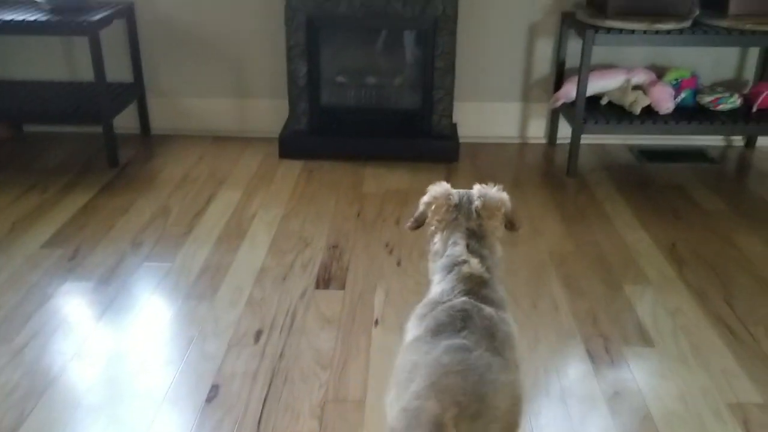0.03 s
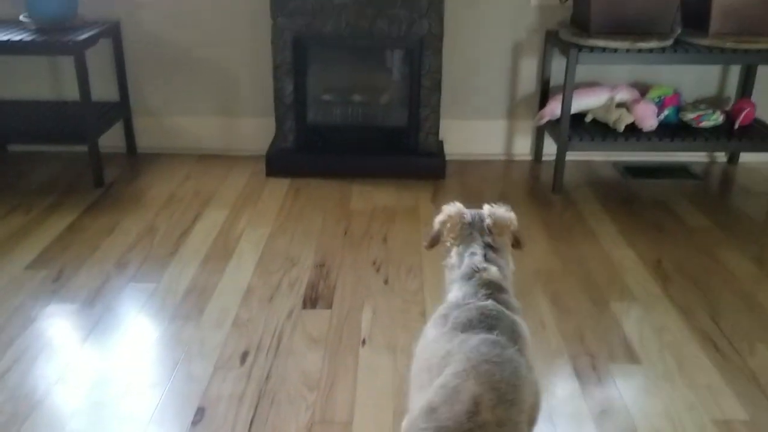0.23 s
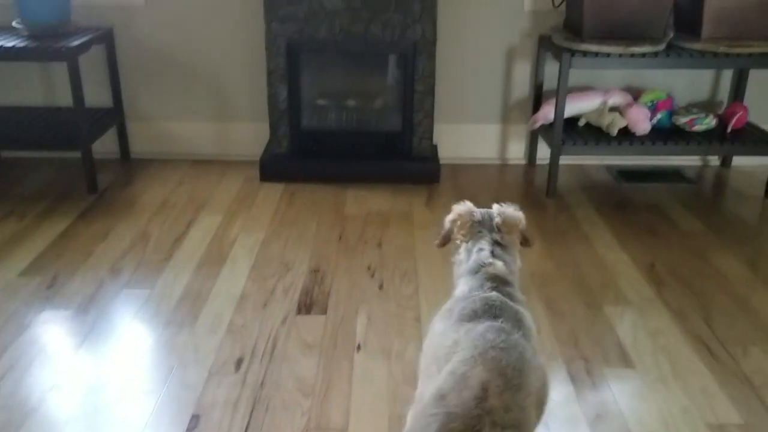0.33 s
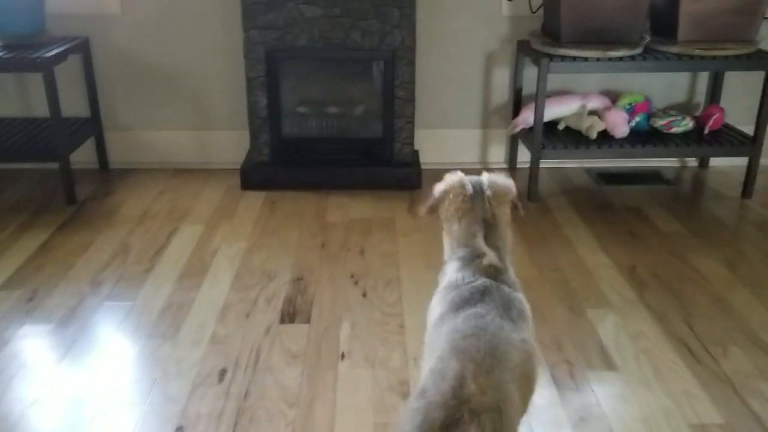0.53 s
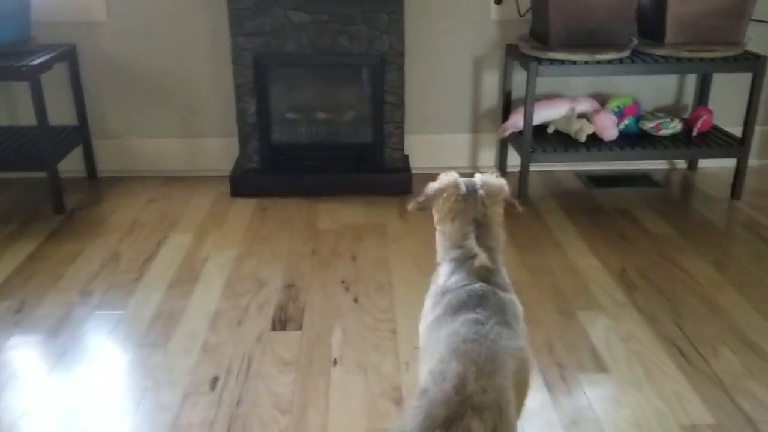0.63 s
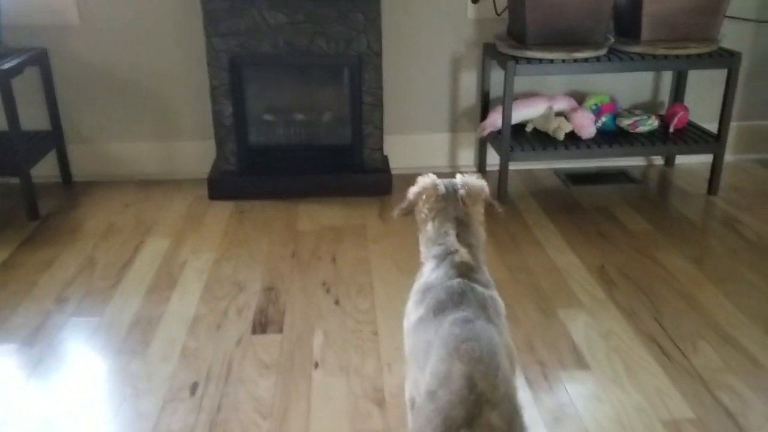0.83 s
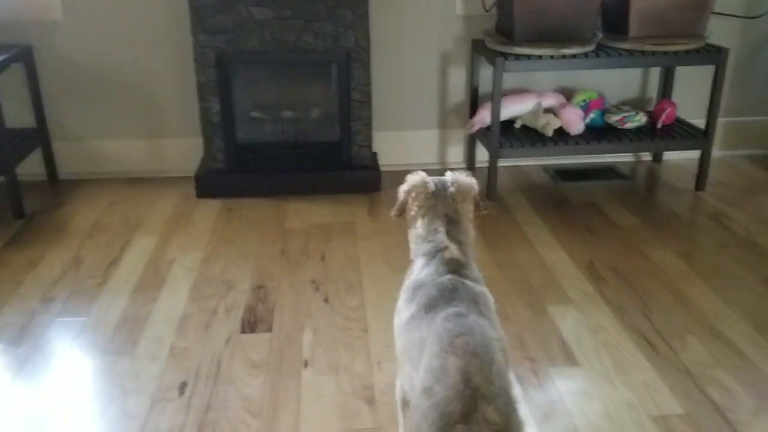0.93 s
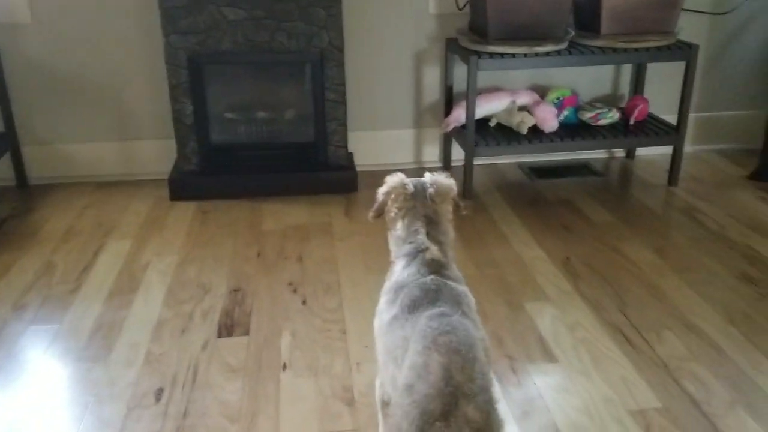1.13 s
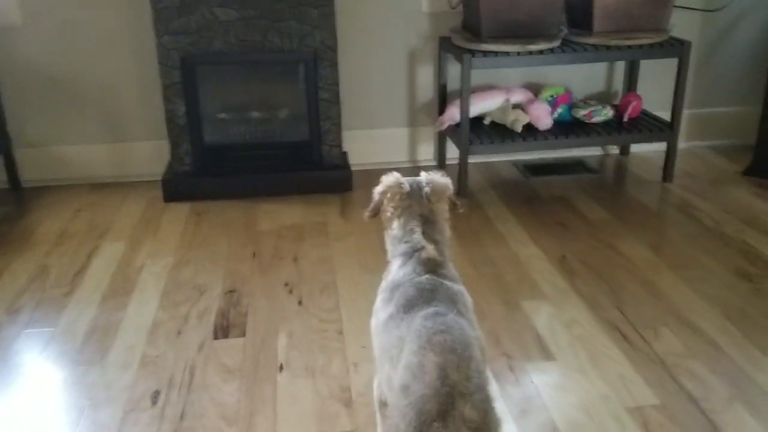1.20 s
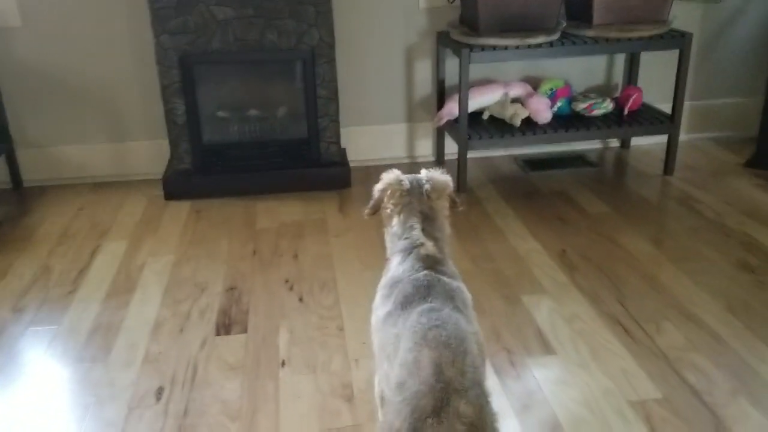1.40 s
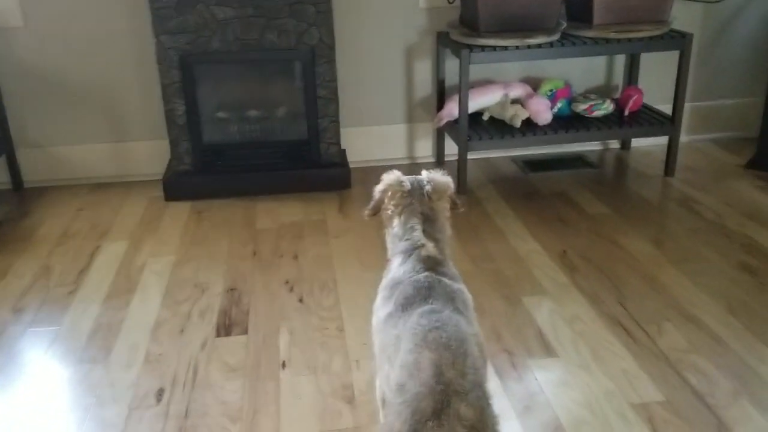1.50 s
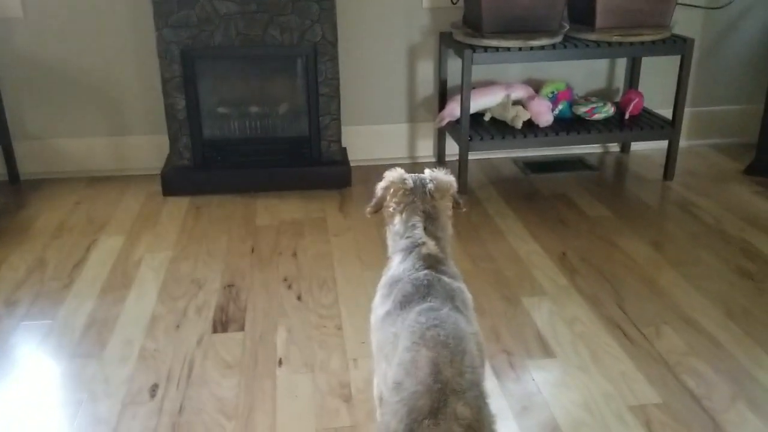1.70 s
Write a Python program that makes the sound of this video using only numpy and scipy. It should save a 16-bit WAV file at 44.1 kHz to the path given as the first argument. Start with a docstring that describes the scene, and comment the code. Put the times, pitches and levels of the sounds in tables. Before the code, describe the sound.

A small dog gives one short, low growl ending in a muffled woof indoors.

```python
"""Small dog growling indoors

In a room with a wooden floor a small dog squeaks through its nose, growls with a closed mouth,
its slack vocal folds ringing chest and throat, and ends in a muffled, airy woof. A soft thump follows.
Then a hand on the case ticks, taps and rustles right by the right microphone, over a low steady hum."""
import sys
import numpy as np
from scipy import signal
from scipy.fft import rfft, irfft
from scipy.io import wavfile

SR = 44100
rng = np.random.default_rng(int(sys.argv[2]) if len(sys.argv) > 2 else 0)


def to_wav(sig):
    """Store sig (one row per channel, or 1-D mono) as 16-bit WAV at the path in sys.argv[1].

    Samples outside -1..1 are clipped; the rate is SR.
    """
    pcm = np.clip(np.atleast_2d(sig), -1, 1) * 32767
    pcm = np.round(pcm).astype(np.int16)
    wavfile.write(sys.argv[1], SR, pcm.T)  # frames by channels


N = 77175
T = np.arange(N) / SR
HZ = np.fft.rfftfreq(N, 1 / SR)

# pitch of the vocal folds (time [s], pitch [Hz])
GROWL_PITCH = [(.195, 288), (.21, 257.6), (.223, 231.8), (.237, 202), (.249, 180.2), (.262, 168.1),
               (.273, 155.7), (.285, 148), (.305, 139), (.325, 134), (.365, 135), (.39, 140), (.413, 138),
               (.435, 159.9), (.457, 161.7), (.478, 143), (.503, 170.1), (.55, 149.5)]
# parts of the growl (time [s], fundamental [dB], second harmonic [dB], overtones [dB], rasp [dB])
GROWL_LEVELS = [(.195, -60.5, -85.5, -85, -80), (.205, -38.5, -62.5, -59.5, -53.5),
                (.222, -38.5, -58, -50.5, -43), (.245, -43.5, -51, -51.5, -41),
                (.26, -35.5, -37.5, -45, -40.5), (.28, -35, -39.5, -47, -44), (.298, -43, -26, -53.5, -47),
                (.318, -46.5, -28.5, -51.5, -43.5), (.342, -46, -32, -52, -42), (.40, -35, -32, -60, -41.5),
                (.42, -35.5, -41, -64.5, -39.5), (.437, -33, -43, -57, -37),
                (.455, -32, -45.5, -55.5, -36.5), (.48, -46.5, -55, -59.5, -40),
                (.501, -41, -55, -59.5, -40.5), (.525, -57, -59, -73.5, -52.5), (.64, -76, -85, -85, -63)]


def amp(db):
    """Decibels to gain."""
    return 10 ** (np.asarray(db) / 20)


def unit(x):
    """Scales to rms 1."""
    return x / np.sqrt(np.mean(abs(x) ** 2) + 1e-20)


def read(points, hz):
    """Reads a spectrum on a log-frequency axis."""
    f, value = np.transpose(points)
    return np.interp(np.log(hz + 1), np.log(f + 1), value)


def curve(table, column=1):
    """Reads one column of a table over time."""
    return np.interp(T, np.array(table)[:, 0], np.array(table)[:, column])


def level(table, column=1):
    """A dB curve as a gain that dies away outside its span."""
    outside = np.maximum(table[0][0] - T, 0) + np.maximum(T - table[-1][0], 0)
    return amp(curve(table, column)) * np.exp(-outside * 200)


def filtered(x, response):
    """Applies a frequency response."""
    return irfft(rfft(x) * response, N)


def noise(colour):
    """Noise of a given spectrum, rms 1."""
    return unit(filtered(rng.standard_normal(N), amp(read(colour, HZ))))


def wander(rate_hz):
    """Random motion up to about the given rate, rms 1."""
    return unit(filtered(rng.standard_normal(N), np.exp(-(HZ / rate_hz) ** 2)))


def pan(db):
    """Constant-power gains for a left-minus-right level."""
    gains = np.array([amp(np.atleast_1d(db)), np.ones(np.size(db))])
    return gains / np.sqrt((gains ** 2).mean(0))


def click(start, colour):
    """A minimum-phase click of energy 1 with a given spectrum."""
    log_gain = np.log(amp(read(colour, abs(np.fft.fftfreq(2048, 1 / SR)))))
    shape = np.fft.ifft(np.exp(np.conj(signal.hilbert(log_gain)))).real
    return np.concatenate([np.zeros(round(start * SR)), shape / np.linalg.norm(shape), np.zeros(N)])[:N]


def ring(start, t60, attack_s=0.00112):
    """Quick attack and exponential decay."""
    age = np.maximum(T - start, 0)
    return np.minimum(age / attack_s, 1) * np.exp(-np.log(1000) * age / t60)


def resonance(hz, half_width):
    """Frequency response of one ringing mode, gain 1 at its centre."""
    return 1 / (1 + 1j * (HZ - hz) / half_width)


def room_tone(floor_db=-68, waver_hz=8, drone_hz=298.8, drone_db=-67.5, drone_s=1.6):
    """Faint noise, a wavering hum and low rumble; a higher drone joins late."""
    floor_colour = [(20, -24), (55, -8.5), (80, -16), (130, -11), (200, -16.5), (300, -25), (500, -32.5),
                    (800, -36), (2000, -38), (5000, -39.5), (15500, -40)]  # steady noise (frequency [Hz], gain [dB])
    likeness = [(30, 0.9), (200, 0.5), (500, 0.4), (1500, 0), (16000, 0)]  # that noise across the microphones (frequency [Hz], correlation [0-1])
    hum_tones = [(59.2, -66.5, 0.32), (135.3, -64.5, 0.11)]  # low hum (frequency [Hz], level [dB], waver [0-1])
    rumble_levels = [(0, -75), (.55, -56.5), (.76, -57.5), (.9, -75), (1.2, -68.5), (1.31, -60.5),
                     (1.4, -62), (1.47, -57.5), (1.56, -66.5), (1.67, -59), (1.75, -61.5)]  # murmur of the room (time [s], level [dB])
    rumble_colour = [(20, -20), (60, 0.5), (90, -4), (135, 5), (200, -4), (290, -10), (400, -27),
                     (1000, -45), (16000, -79.5)]  # its spectrum (frequency [Hz], gain [dB])
    left, other = noise(floor_colour), noise(floor_colour)
    same = read(likeness, HZ)
    right = filtered(left, same) + filtered(other, np.sqrt(1 - same ** 2))
    hum = np.zeros(N)
    for hz, db, waver in hum_tones:
        drift = 1 + waver * (wander(waver_hz) + 1j * wander(waver_hz))
        hum += amp(db) * unit((drift * np.exp(2j * np.pi * hz * T)).real)
    fade_in = (1 + np.tanh((T - drone_s) / 0.024)) / 2
    drone = amp(drone_db) * unit(np.sin(2 * np.pi * drone_hz * T)) * fade_in
    rumble = level(rumble_levels) * noise(rumble_colour)
    return amp(floor_db) * np.array([left, right]) + hum + drone + rumble


def room(x, gap_s=0.0042):
    """Direct sound plus a short tail at each microphone; the treble leans to the right."""
    decay_times = [(100, .26), (300, 0.18), (1000, 0.22), (4000, 0.26), (14000, 0.13)]  # reverberation (frequency [Hz], t60 [s])
    tail_levels = [(100, -18.5), (330, -14.5), (600, -3), (1400, -2), (4000, 1.5), (14000, 13)]  # tail against direct sound (frequency [Hz], level [dB])
    balance = [(100, 0.5), (700, -1.5), (1300, 1), (2400, -3), (4400, -7), (6500, -1), (8100, -1.5),
               (15000, -2)]  # stereo image (frequency [Hz], left minus right [dB])
    hz, t, spectra = signal.stft(rng.standard_normal((2, SR // 2)), SR, nperseg=256)
    t60 = read(decay_times, hz)[:, None]
    onset = np.clip(t / gap_s - 1, 0, 1)
    decay = np.exp(-np.log(1000) * t / t60) / np.sqrt(t60)
    tail = signal.istft(spectra * onset * decay, SR, nperseg=256)[1]
    wet = amp(read(tail_levels, HZ))
    response = (1 + wet * rfft(tail / np.linalg.norm(tail[0]), N)) / np.sqrt(1 + wet ** 2)
    return filtered(x, response * pan(read(balance, HZ)))


def hiss():
    """A faint high hiss swells before the ticks and fades after them."""
    swell = [(.95, -88.5), (1.1, -75.5), (1.22, -76), (1.3, -72.5), (1.4, -76.5), (1.48, -88)]  # course of the hiss (time [s], level [dB])
    colour = [(1000, -19), (3300, -12.5), (4100, -4.5), (4900, -9.5), (5900, -1), (6700, -12), (7600, -8),
              (10000, -20), (14000, -6), (16000, -21)]  # its spectrum (frequency [Hz], gain [dB])
    return level(swell) * noise(colour)


def grip_crackle(slips_per_s=1800, spread_db=4.5):
    """Many tiny slips of a grip on the case, close on the right."""
    levels = [(1.285, -75), (1.304, -58.5), (1.313, -58.5), (1.317, -63), (1.322, -53), (1.33, -67),
              (1.355, -72.5), (1.38, -65.5), (1.42, -79)]  # crackle around the ticks (time [s], level [dB])
    colour = [(300, -2), (1200, -3), (2200, -10), (3500, 1.5), (4600, 0.5), (6000, -7), (8000, -10.5),
              (11000, -20), (13800, -10), (16000, -23)]  # one slip (frequency [Hz], gain [dB])
    slips = (rng.random(N) < slips_per_s / SR) * rng.choice([-1, 1], N)
    strength = amp(spread_db * np.clip(rng.standard_normal(N), -2, 2))
    crackle = unit(signal.fftconvolve(slips * strength, click(0, colour))[:N])
    return pan(db=-18) * level(levels) * crackle


def case_ticks():
    """Sharp, dry ticks beside the right microphone."""
    ticks = [(1.2429, -44, -21), (1.2581, -41, -23), (1.292, -44, -20), (1.2943, -37, -23),
             (1.3037, -40, -18), (1.306, -37, -21), (1.3109, -15.5, -45), (1.3198, -34.5, -6)]  # handling ticks (time [s], level [dB], left minus right [dB])
    colour = [(100, -13), (400, -5.5), (1200, 0.5), (1900, -7), (2600, -2.5), (4900, 1), (6300, -11),
              (8000, -18), (10500, -34), (13500, -21), (16000, -36)]  # one tick (frequency [Hz], gain [dB])
    return sum(amp(db) * pan(side_db) * click(start, colour) for start, db, side_db in ticks)


def case_tap(start=1.324, tap_db=-17.5, push_db=-43, lag_s=0.0035, width_s=0.0014):
    """A duller tap at the right microphone; the case gives a little under it."""
    colour = [(60, 2), (250, 1), (700, 5.5), (1400, -6), (2000, -18), (2900, -20), (3600, -8), (4600, 1),
              (5500, -17), (6500, -14), (8000, -16), (11000, -31), (13800, -17), (16000, -38)]  # the tap (frequency [Hz], gain [dB])
    push = amp(push_db) * np.exp(-((T - start - lag_s) / width_s) ** 2)
    return pan(db=-33) * (amp(tap_db) * click(start, colour) + push)


def hand_rustles(grain_depth=0.33, grain_hz=400):
    """Brief, grainy rubs of the hand, close on the right."""
    # strokes of the hand (peak time [s], rise [s], fall [s], level [dB], spectrum shift [ratio])
    strokes = [(.728, .018, 0.03, -62.5, 1.17), (1.307, 0.028, 0.021, -64.5, 1),
               (1.373, 0.0037, 0.022, -54, 1.014), (1.435, .015, 0.027, -71.5, 1.1)]
    colour = [(200, -3.5), (700, -11), (1800, -16.5), (2800, -16), (3350, 2.5), (4300, 1), (5100, -16),
              (7000, -23), (10000, -28), (13700, -24), (16000, -29)]  # rubbing noise (frequency [Hz], gain [dB])
    grain = unit(np.exp(grain_depth * wander(grain_hz)))
    rub = np.zeros((2, N))
    for peak, rise, fall, db, ratio in strokes:
        shifted = [(hz * ratio, gain_db) for hz, gain_db in colour]
        envelope = np.exp(-np.maximum((peak - T) / rise, (T - peak) / fall))
        rub += amp(db) * envelope * np.array([noise(shifted), noise(shifted)])
    return pan(db=-12.5) * grain * rub


def thumps(knock_t60=0.16):
    """Soft blows out in the room ring a few low modes, each with a dull knock on top."""
    blows = [(0.6939, -53, 0.21, -53), (.716, -48, 0.19, -65), (0.744, -60, 0.11, -67.5)]  # impacts (time [s], body level [dB], body t60 [s], knock level [dB])
    modes = [(92, -5), (150, -5.5), (230, -3), (255, -9), (370, -13.5)]  # the struck body (frequency [Hz], gain [dB])
    knock_colour = [(100, -3), (400, 4), (600, -10.5), (1100, -5.5), (1600, -30), (4000, -28), (16000, -29)]  # the knock (frequency [Hz], gain [dB])
    out = np.zeros(N)
    for start, body_db, t60, knock_db in blows:
        body = unit(sum(amp(db) * np.sin(2 * np.pi * hz * (T - start)) for hz, db in modes))
        out += amp(body_db) * ring(start, t60) * body
        out += amp(knock_db) * ring(start, knock_t60) * noise(knock_colour)
    return out


def nose_squeak(partials_db=(2.5, -17.5, -27), waver=0.008, air_db=-14.5, air_lag_s=0.024):
    """A thin, falling whistle in the nose that trails off into hiss."""
    whistle = [(.155, 4090, -80.5), (.168, 4050, -57.5), (.18, 3990, -49), (.197, 3900, -51.5),
               (.218, 3907, -64.5), (.24, 3890, -77.5), (.262, 4020, -63.5), (.30, 3905, -76)]  # course of the squeak (time [s], pitch [Hz], level [dB])
    air_colour = [(2000, -25.5), (3500, -19.5), (4000, -6), (4500, -26.5), (6800, -23), (7550, -9.5),
                  (8050, 3), (8700, -14), (9700, -10), (10700, -21), (11800, -13.5), (14000, -30)]  # trailing hiss (frequency [Hz], gain [dB])
    hz = curve(whistle) * (1 + waver * wander(rate_hz=300))
    phase = 2 * np.pi * np.cumsum(hz) / SR
    tone = unit(sum(amp(db) * np.sin(k * phase) for k, db in enumerate(partials_db, 1)))
    flow = level(whistle, column=2)
    air = amp(air_db) * np.interp(T - air_lag_s, T, flow) * noise(air_colour)
    return pan(db=2) * (flow * tone + air)


def woof(flutter_depth=0.37, flutter_hz=160, ring_db=-2):
    """Air passes the nose, leaks at the lips, then bursts out in a fluttering puff that rings on."""
    nose_levels = [(0, -75), (.17, -72.5), (.192, -72), (.205, -59), (.26, -59), (.31, -75), (.43, -74.5)]  # air through the nose (time [s], level [dB])
    nose_colour = [(300, -4), (550, -0.5), (900, -7), (1320, 1), (1550, -13.5), (1850, -13.5), (2080, 1),
                   (2400, -9), (2830, -1.5), (3100, -6), (3600, -7), (4400, -14), (5200, -18),
                   (6000, -30.5), (16000, -28)]  # its spectrum (frequency [Hz], gain [dB])
    lip_levels = [(0, -73), (.05, -75.5), (.13, -88), (.22, -75), (.31, -67), (.332, -60.5), (.38, -63.5),
                  (.443, -61.5), (.459, -43.5), (.49, -54.5), (.56, -74)]  # air past the lips (time [s], level [dB])
    lip_colour = [(300, -26), (2000, -27), (2450, -14.5), (2820, 0), (3150, -4), (3600, -8), (4300, -2.5),
                  (5150, -2.5), (5750, -26), (12000, -20), (16000, -33)]  # its spectrum (frequency [Hz], gain [dB])
    puff_levels = [(.445, -72), (.46, -55.5), (.475, -41.5), (.492, -43.5), (.52, -48), (.55, -62.5),
                   (.61, -65.5), (.67, -97)]  # the burst of air (time [s], level [dB])
    puff_colour = [(400, -10.5), (950, -8.5), (1400, -3.5), (1800, -7), (2250, -1.5), (2550, -4),
                   (3100, -10), (4200, -2.5), (4950, -8), (5900, -18.5), (8000, -17), (10000, -20.5),
                   (13500, -20), (16000, -50.5)]  # its spectrum (frequency [Hz], gain [dB])
    modes = [(1446, 16, 8), (1544, 13, 15), (2781, 12, 16), (4946, 16, 5)]  # resonances it rings (frequency [Hz], half width [Hz], gain [dB])
    puff = level(puff_levels) * unit(noise(puff_colour) * np.exp(flutter_depth * wander(flutter_hz)))
    ringing = filtered(puff, sum(amp(db) * resonance(hz, width) for hz, width, db in modes))
    nose = level(nose_levels) * noise(nose_colour)
    lips = pan(db=-6.5) * level(lip_levels) * noise(lip_colour)
    return nose + lips + puff + amp(ring_db) * ringing


def rasp(jitter=0.35, jitter_hz=150, strength_spread=0.27):
    """Uneven slaps of the vocal folds ring the resonances of the chest and throat."""
    modes = [(120.7, 16, -4), (169.2, 17.8, -1.5), (237, 21, -0.5), (276.6, 14, 0.5), (321, 13, 2),
             (367, 16, -6), (443.8, 15, -8.5), (529.7, 13, -19), (592, 16, -21.5), (674, 16, -18.5),
             (801, 46, -24)]  # chest and throat (frequency [Hz], half width at -6 dB [Hz], gain [dB])
    cycles = np.cumsum(curve(GROWL_PITCH) * np.exp(jitter * wander(jitter_hz))) / SR
    slaps = np.diff(np.floor(cycles), prepend=0)  # one impulse a cycle
    strength = np.exp(strength_spread * rng.standard_normal(N))
    body = sum(amp(db) * resonance(hz, width) ** 2 for hz, width, db in modes)
    return level(GROWL_LEVELS, column=4) * unit(filtered(slaps * strength, body))


def growl_tone(jitter=0.014, flutter_hz=65, chest_hz=254.3, chest_db=2.5):
    """Slack vocal folds slide down in pitch; the chest rings on and the throat picks out overtones."""
    roughness = [(.195, 0, .3), (.23, .33, .6), (.27, .25, .55), (.305, .18, .36), (.345, .42, .4),
                 (.39, .42, .6), (.42, .5, .85), (.445, .3, .85), (.475, .8, .95)]  # noisy part of the voice (time [s], harmonics 1-2 [0-1], overtones [0-1])
    throat = [(300, -10), (440, -4), (485, -13.5), (530, 11), (560, -4), (585, 0), (625, -9), (668, 0.5),
              (730, -8), (790, -8), (830, -17), (1100, -24.5), (1600, -38), (2100, -27), (2400, -34),
              (4000, -45)]  # throat response (frequency [Hz], gain [dB])
    hz = curve(GROWL_PITCH) * (1 + jitter * wander(flutter_hz))
    phase = 2 * np.pi * np.cumsum(hz) / SR
    low_rough, high_rough = curve(roughness, column=1), curve(roughness, column=2)

    def harmonic(k, rough):
        """A pure partial blended with a narrow band of noise around it."""
        band = wander(flutter_hz) * np.cos(k * phase) + wander(flutter_hz) * np.sin(k * phase)
        return np.sqrt(2 * (1 - rough ** 2)) * np.cos(k * phase) + rough * band

    fundamental = level(GROWL_LEVELS, column=1) * harmonic(1, low_rough)
    chest = amp(chest_db) * filtered(fundamental, resonance(chest_hz, half_width=8))
    buzz = sum(harmonic(k, high_rough) for k in range(3, 28))
    overtones = level(GROWL_LEVELS, column=3) * unit(signal.fftconvolve(buzz, click(0, throat))[:N])
    second = level(GROWL_LEVELS, column=2) * harmonic(2, low_rough)
    return fundamental + chest + second + overtones


def growl(low_cut_hz=108):
    """The pitched and the rasping part of the voice, with no deep bass."""
    high_pass = 1 / np.sqrt(1 + (low_cut_hz / (HZ + 1)) ** 10)
    return filtered(growl_tone() + rasp(), high_pass)


def scene():
    """The dog and the thumps out in the room, dry handling at the microphone, and room tone."""
    dog = growl() + woof() + nose_squeak()
    in_room = room(dog + thumps() + hiss())
    handling = case_ticks() + case_tap() + hand_rustles() + grip_crackle()
    return in_room + handling + room_tone()


def record(dry, edge_hz=15850):
    """The recorder's band limit."""
    low_pass = signal.firwin(511, edge_hz, window=("kaiser", 9), fs=SR)
    return signal.oaconvolve(dry, low_pass[None], "same")


dry = scene()
out = record(dry)
to_wav(out)
```